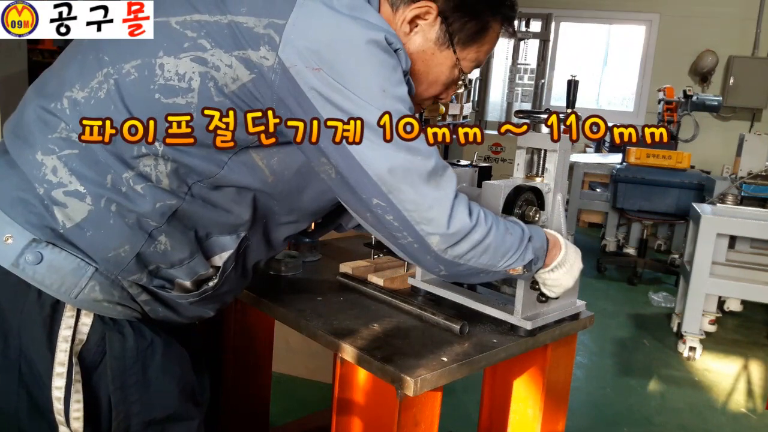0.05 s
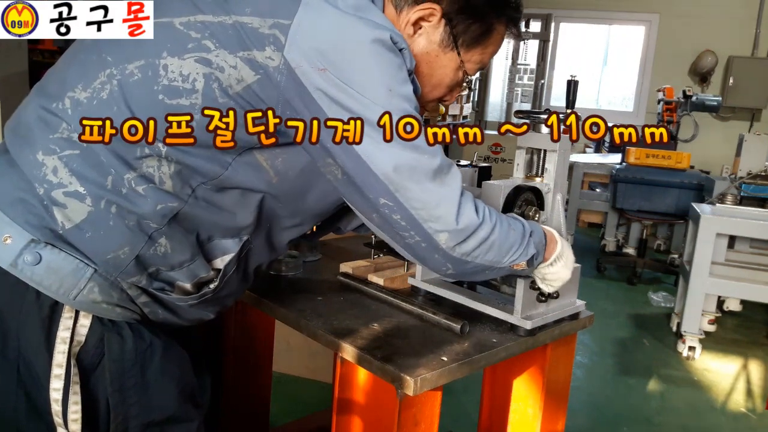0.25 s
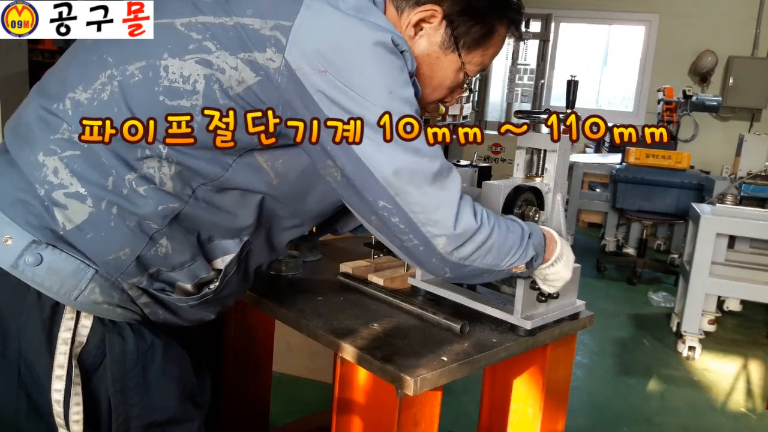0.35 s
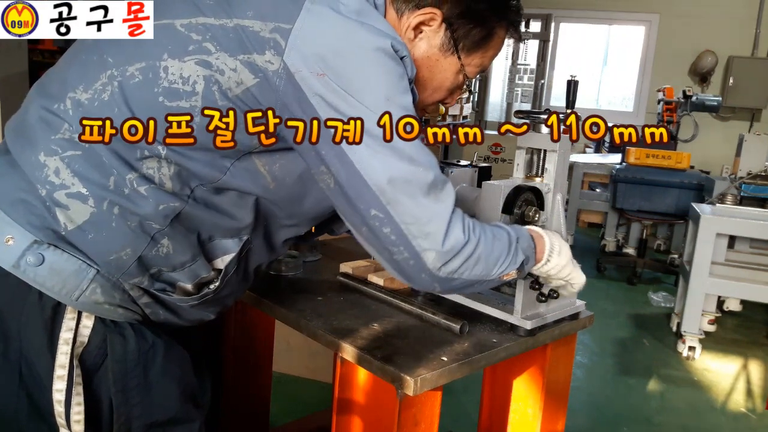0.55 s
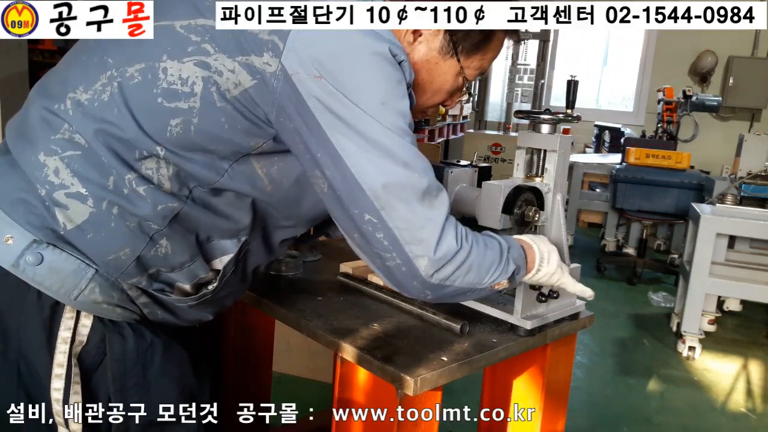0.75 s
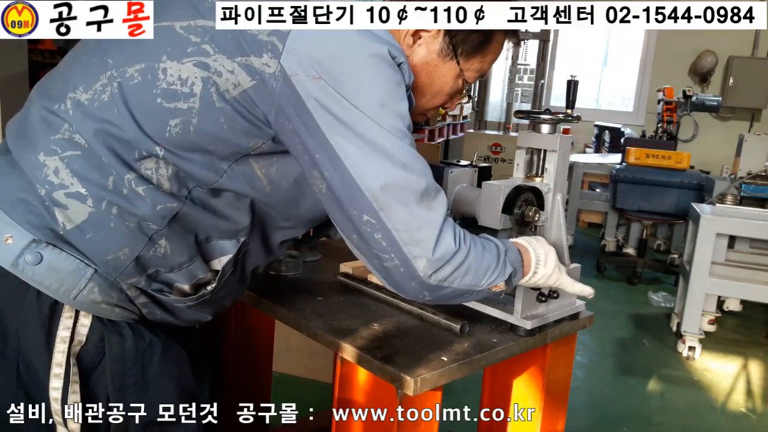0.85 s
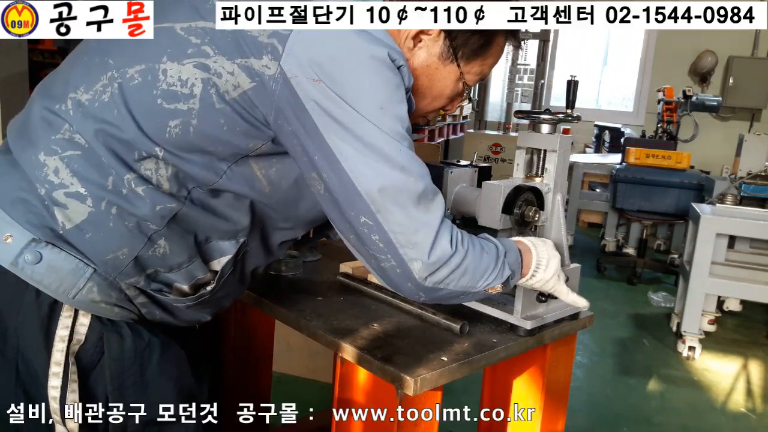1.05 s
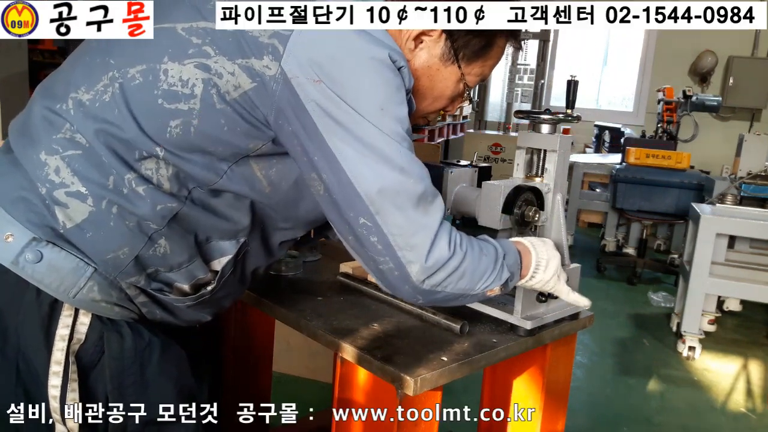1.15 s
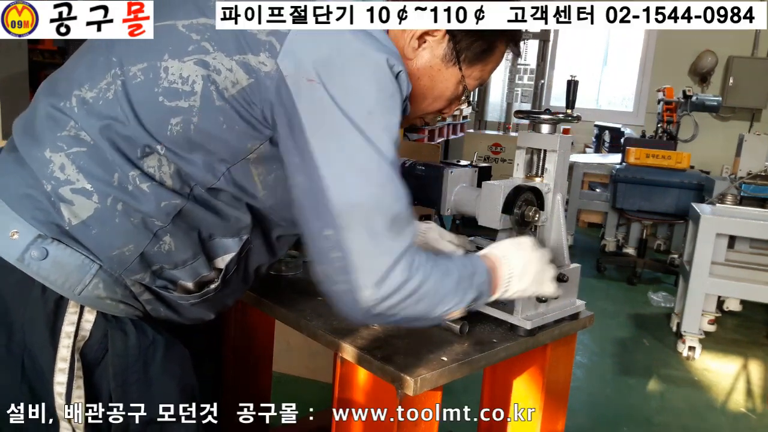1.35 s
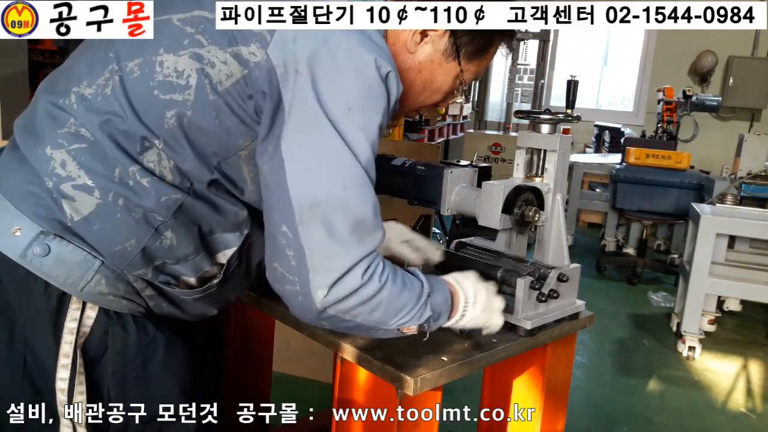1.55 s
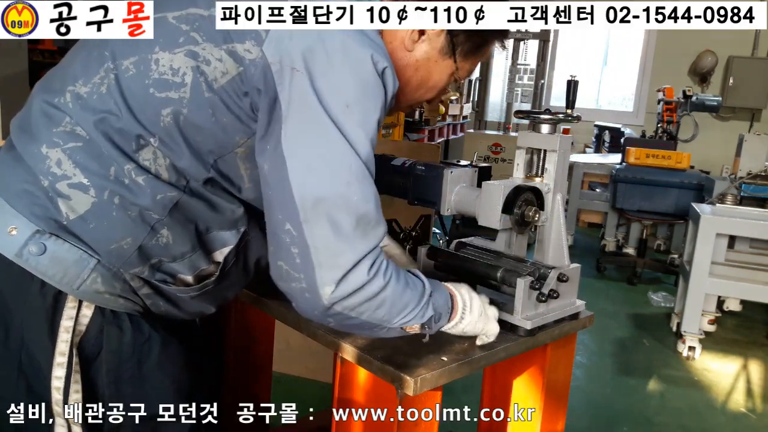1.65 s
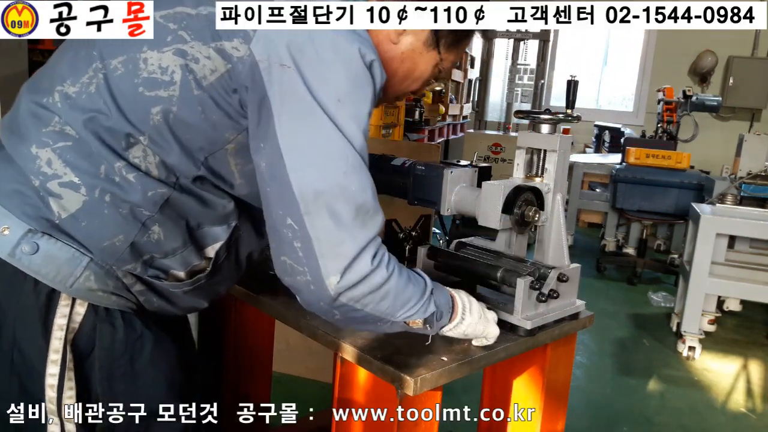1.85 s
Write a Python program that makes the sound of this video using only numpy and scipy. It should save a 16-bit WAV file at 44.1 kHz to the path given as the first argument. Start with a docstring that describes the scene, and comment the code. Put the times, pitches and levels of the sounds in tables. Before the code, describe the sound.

Steel pipe being set into a metal cutting machine: soft knocks, one sharp loud clank with fading bounces, short ringing tail, later small taps. Reverberant workshop, fairly close microphone, faint distant machinery hum and hiss.

```python
"""In a hard-walled workshop a steel pipe is set into a cutting machine on a steel bench: light knocks,
one hard clank with fading bounces, then small taps as it settles. Each contact is a filtered noise
burst that excites decaying modes: the pipe wall high and bright, the frame, bench and clamp lower.
Diffuse echoes follow the knocks. Coloured noise makes a low rumble, faint hiss and the brush of a
sleeve; wavering sinusoids make the hum of distant machinery."""
import sys
import numpy as np
from scipy import signal
from scipy.fft import rfft, irfft, next_fast_len
from scipy.io import wavfile
from scipy.ndimage import map_coordinates

SR = 44100
rng = np.random.default_rng(int(sys.argv[2]) if len(sys.argv) > 2 else 0)


def put_to_file(sound):
    """Save the sound as 16-bit audio at rate SR, in the file named by the first command-line argument."""
    columns = np.atleast_2d(sound).T  # one column per channel
    safe = np.clip(columns, -1, 1)
    whole_steps = np.round(safe * 32767)
    wavfile.write(sys.argv[1], SR, whole_steps.astype(np.int16))


N = 83790


def amp(db):
    """Level law: decibels to a linear amplitude gain."""
    return 10 ** (np.asarray(db) / 20)


def unit(x):
    """Power normalisation: scale to an rms of 1."""
    return x / np.sqrt(np.mean(np.abs(x) ** 2) + 1e-20)


def along(points, hz):
    """Logarithmic pitch scale: interpolate (Hz, value) points over log frequency."""
    point_hz, value = np.transpose(points)
    return np.interp(np.log(hz + 1), np.log(point_hz + 1), value)


def fade(t, t60):
    """Exponential decay: the level falls 60 dB in t60 seconds."""
    return np.exp(-np.log(1000) * t / t60)


def wobble(rate):
    """Slow random modulation: a smooth curve of rms 1 through `rate` random knots a second."""
    knots = rng.standard_normal(N // 100)
    position = np.arange(N) * rate / SR + 2
    return unit(map_coordinates(knots, [position], mode="wrap"))


def coloured(x, gain):
    """Minimum-phase filtering: folding the cepstrum gives a causal filter of the wanted gain."""
    n = x.shape[-1]
    m = 2 * next_fast_len(n // 2 + 2048)
    log_gain = np.log(np.maximum(gain(np.fft.rfftfreq(m, 1 / SR)), 1e-6))
    cepstrum = irfft(log_gain)
    cepstrum[1:m // 2] *= 2
    cepstrum[m // 2 + 1:] = 0
    response = np.exp(rfft(cepstrum))
    return irfft(rfft(x, m) * response, m)[..., :n]


def stereo(mid, side):
    """Mid-side principle: left is the sum, right the difference."""
    return np.array([mid + side, mid - side])


def add(track, sound, s):
    """Superposition: mix a sound into the track from second s on."""
    start = max(round(s * SR), 0)
    track[:, start:start + sound.shape[1]] += sound[:, :N - start]


# Stereo width of diffuse sound. Each row: frequency in Hz, side over mid level in dB.
DIFFUSE_WIDTH = [(100, -15), (280, -10), (550, -3.5), (1100, 1), (5000, 1), (13000, 1)]


def air(spectrum):
    """Diffuse field: independent mid and side noise share a spectrum, with the bass kept central."""
    noise = rng.standard_normal((2, N))
    mid, side = unit(coloured(noise, lambda hz: amp(along(spectrum, hz))))
    return stereo(mid, coloured(side, lambda hz: amp(along(DIFFUSE_WIDTH, hz))))


# Hum of distant machinery. Each row: frequency in Hz, rms level in dB before the lean to the right.
MACHINERY_HUM = [(88, -65), (149, -60), (186, -61), (282, -64), (359, -68)]
HUM_WAVER, HUM_WAVER_PER_S = 0.2, 9  # depth as a ratio, knots per second


def machinery_hum():
    """Narrow-band modulation: random amplitude and phase sway make each steady tone waver."""
    t = np.arange(N) / SR
    hum = np.zeros(N)
    for hz, db in MACHINERY_HUM:
        sway = wobble(HUM_WAVER_PER_S) + 1j * wobble(HUM_WAVER_PER_S)
        tone = np.real((1 + HUM_WAVER * sway) * np.exp(2j * np.pi * hz * t))
        hum += amp(db) * unit(tone)
    return hum


# Spectrum of the low rumble. Each row: frequency in Hz, relative level in dB per Hz.
RUMBLE_SPECTRUM = [(25, -27.5), (58, -13.5), (95, -1.5), (157, -7), (214, -15.5), (273, -6), (310, -13.5),
                   (361, -13.5), (430, -21.5), (540, -27), (920, -28), (1300, -60)]
# Spectrum of the hiss. Each row: frequency in Hz, relative level in dB per Hz.
HISS_SPECTRUM = [(600, -31.5), (1100, -2), (2000, -5), (4000, -14.5), (8000, -22.5), (10000, -23.5),
                 (13000, -14.5), (15500, -20)]
RUMBLE_DB, RUMBLE_SWAY_DB, HISS_DB = -49, 1.5, -70


def background():
    """Incoherent addition: swaying rumble and hum, a little to the right, with faint hiss."""
    rumble = amp(RUMBLE_DB + RUMBLE_SWAY_DB * wobble(9)) * air(RUMBLE_SPECTRUM)
    low = rumble + machinery_hum()
    lean_right = amp(stereo(0, -0.65))[:, None]  # left down, right up by 0.65 dB
    return low * lean_right + amp(HISS_DB) * air(HISS_SPECTRUM)


def soft(hz, dull_hz):
    """Contact time: a softer contact lasts longer and excites less treble."""
    return 1 / np.sqrt(1 + (hz / dull_hz) ** 6)


# Decay of the room. Each row: frequency in Hz, time to fall 60 dB in seconds.
ROOM_DECAY = [(200, 0.42), (1000, 0.87), (2300, 0.95), (5000, 0.79), (8000, .5), (13000, 0.38)]
# Colour of the room. Each row: frequency in Hz, relative level in dB.
ROOM_SPECTRUM = [(200, 17), (1100, -6.5), (2300, -2.5), (3000, -11), (4000, 1.5), (7000, 3), (13000, -3)]
ROOM_DB, ROOM_DELAY_S = -2, 0.00442  # echo over input energy, build-up time


def workshop(x):
    """Reverberation: convolution with noise that decays slowest in the middle frequencies."""
    hz, t, bands = signal.stft(rng.standard_normal((2, SR)), SR, nperseg=256)
    decay = fade(t, along(ROOM_DECAY, hz)[:, None])
    bands = bands * decay * amp(along(ROOM_SPECTRUM, hz))[:, None]
    bands[1] *= amp(along(DIFFUSE_WIDTH, hz))[:, None]
    tail = signal.istft(bands, SR, nperseg=256)[1]
    tail_t = np.arange(tail.shape[1]) / SR
    tail = tail * (1 - np.exp(-(tail_t / ROOM_DELAY_S) ** 2))
    tail = tail / np.linalg.norm(tail[0])
    mid, side = signal.fftconvolve(x[None], tail, axes=1)[:, :len(x)]
    return amp(ROOM_DB) * stereo(mid, side)


# Colour common to all contacts. Each row: frequency in Hz, relative level in dB.
KNOCK_COLOUR = [(100, -23), (260, -21), (550, -12.5), (720, -3), (1130, 4.5), (1350, -5.5), (1800, -3),
                (2400, -5), (2950, -3), (3400, -10.5), (4700, -12.5), (5300, -4), (5900, -13.5),
                (8000, -24), (10300, -29.5), (12200, 1), (14500, -8)]
KNOCK_T60_S, KNOCK_RISE_S = 0.0063, 0.00036  # decay and rise of the crack
CLATTER_DB, CLATTER_T60_S = -16.5, 0.065  # relative to the crack
CONTACT_PEAK_DB, CONTACT_PEAK_OCTAVES = 6.5, 0.37  # height and spread of the struck spot's peak
KNOCK_WIDTH = 0.47  # side over mid ratio


def knock(pitch_hz, dull_hz):
    """Impact excitation: a crack and brief clatter, pitched by the struck spot, then the room."""
    t = np.arange(SR) / SR
    crack_and_clatter = fade(t, KNOCK_T60_S) + amp(CLATTER_DB) * fade(t, CLATTER_T60_S)
    shape = crack_and_clatter * (1 - np.exp(-t / KNOCK_RISE_S))

    def colour(hz):
        """Spectral shaping: common colour, a peak at the struck spot and the contact's softness."""
        octaves = np.log2((hz + 1) / pitch_hz)
        spot_db = CONTACT_PEAK_DB * np.exp(-.5 * (octaves / CONTACT_PEAK_OCTAVES) ** 2)
        return amp(along(KNOCK_COLOUR, hz) + spot_db) * soft(hz, dull_hz)

    bursts = rng.standard_normal((2, SR)) * shape
    impulse = t == 0
    parts = coloured(np.vstack([bursts, impulse]), colour)
    # all three get the energy of the envelope
    mid, side, push = parts * np.linalg.norm(shape) / np.linalg.norm(parts, axis=1, keepdims=True)
    return stereo(mid, KNOCK_WIDTH * side) + workshop(push)


FLUTTER_PER_S, SHIMMER_PER_S = 32, 130  # random knots per second
SHIMMER_DB = -9  # relative to the slow beats


def flutter(t):
    """Interference: a reflected mode sways in slow random beats and a fainter fast shimmer."""
    slow, fast = [map_coordinates(rng.standard_normal(len(t)), [t * rate + 2], mode="wrap")
                  for rate in (FLUTTER_PER_S, SHIMMER_PER_S)]
    return slow + amp(SHIMMER_DB) * fast


RING_RISE_S, RING_BUILD_S = 0.0011, 0.0033  # time constants of direct and reflected sound
RING_DIRECT_DB, RING_ROOM_DB = -2.5, -1.5


def ring(modes, dull_hz):
    """Modal decay: struck modes build up reflections that flutter differently at each ear."""
    t = np.arange(SR) / SR
    knots = np.linspace(0, 1, num=500)  # seconds, a coarse grid for the envelopes
    out = np.zeros((2, SR))
    direct = amp(RING_DIRECT_DB) * (1 - np.exp(-knots / RING_RISE_S))
    build_up = amp(RING_ROOM_DB) * (1 - np.exp(-knots / RING_BUILD_S))
    for hz, db, t60 in modes:
        a, b, c, d = [flutter(knots) for _ in range(4)]
        decay = fade(knots, t60)
        energy = decay ** 2

        def even(z):
            """Energy normalisation: rms 1 as weighted by the decaying mode."""
            return z / np.sqrt(np.average(np.abs(z) ** 2, weights=energy))

        mid = even(a + 1j * b - np.average(a, weights=energy))
        side = amp(along(DIFFUSE_WIDTH, hz)) * even(c + 1j * d)
        swing = direct + build_up * stereo(mid, side)
        swing = amp(db) * soft(hz, dull_hz) * decay * swing
        phase = (2 * np.pi * (hz * t + rng.random())).astype(np.float32)
        cos, sin = np.cos(phase), np.sin(phase)
        out += [np.interp(t, knots, ear.real) * cos + np.interp(t, knots, ear.imag) * sin
                for ear in swing]
    return out


# Contacts of pipe and machine. Each row: start in seconds, knock level in dB, knock pitch in Hz,
# frequency in Hz above which it is dull, then pipe, frame and clamp ring levels in dB.
CONTACT_EVENTS = [(.0150, -30, 2930, 3650, -68, -55.5, -49.5), (0.036, -35, 2700, 3700, -62, -62.5, -60.5),
                  (0.152, -27.5, 1950, 2660, -42, -55.5, -42.5), (.231, -6, 2800, 6580, -19.5, -34, -49),
                  (0.2506, -15, 2350, 5500, -22, -48, -63), (0.298, -36.5, 2420, 3140, -12.5, -50.5, -69),
                  (.403, -45.5, 2400, 2980, -27.5, -68, -72), (0.8742, -37.5, 1566, 3260, -56, -74, -72),
                  (.885, -33.5, 896, 2626, -50.5, -68.5, -62), (1.0405, -39, 2520, 4700, -70, -88, -68)]
# Modes of the pipe wall. Each row: frequency in Hz, relative level in dB, 60 dB decay in seconds.
PIPE_MODES = [(5242, -16, .42), (5318, 0, .57), (5364, -12, .57), (11480, -10, .24), (11660, 3, .28),
              (12180, -3, .32), (12300, -7, .26), (12540, -6, .18), (13620, 10, .21), (15110, -3, .24),
              (15515, -2, .18)]
# Modes of machine frame and bench. Each row: frequency in Hz, relative level in dB, 60 dB decay in seconds.
FRAME_MODES = [(255, 4, .62), (400, -7, .5), (675, -9, .45), (737, -7, .3), (867, -6, .28), (1023, -6, .65),
               (1071, -7, .6), (1178, -1, .52), (1703, -5, .35), (2380, -6, .65), (2449, -7, .6),
               (2732, -3, .32), (2879, -2, .32), (3000, -2, .3)]
# Modes of the loose clamp. Each row: frequency in Hz, relative level in dB, 60 dB decay in seconds.
CLAMP_MODES = [(1250, 0, .22), (1340, -2, .22), (1440, -1, .24)]


def pipe():
    """Linear superposition: every contact knocks and sets pipe, frame and clamp ringing anew."""
    out = np.zeros((2, N))
    for s, knock_db, pitch_hz, dull_hz, pipe_db, frame_db, clamp_db in CONTACT_EVENTS:
        contact = amp(knock_db) * knock(pitch_hz, dull_hz)
        contact += amp(pipe_db) * ring(PIPE_MODES, dull_hz)
        contact += amp(frame_db) * ring(FRAME_MODES, dull_hz)
        contact += amp(clamp_db) * ring(CLAMP_MODES, dull_hz)
        add(out, contact, s)
    return out


# Spectrum of the cloth noise. Each row: frequency in Hz, relative level in dB.
CLOTH_SPECTRUM = [(500, -14), (1400, 0), (3000, -18.5), (12000, -29)]
RUSTLE_S, RUSTLE_LENGTH_S = 1.585, .025  # centre and standard deviation of the swell
RUSTLE_DB = -68


def sleeve():
    """Friction noise: cloth brushes past in a faint Gaussian swell as the arm swings."""
    t = np.arange(N) / SR
    swell = np.exp(-.5 * ((t - RUSTLE_S) / RUSTLE_LENGTH_S) ** 2)
    return amp(RUSTLE_DB) * swell * air(CLOTH_SPECTRUM)


def scene():
    """Superposition: background, pipe and sleeve sound together."""
    return background() + pipe() + sleeve()


TOP_HZ = 15900


def record(dry):
    """Band limiting: nothing at or above the top frequency is kept."""
    m = 2 * next_fast_len(N)
    passed = np.fft.rfftfreq(m, 1 / SR) < TOP_HZ
    return irfft(rfft(dry, m) * passed, m)[:, :N]


dry = scene()
out = record(dry)
put_to_file(out)
```